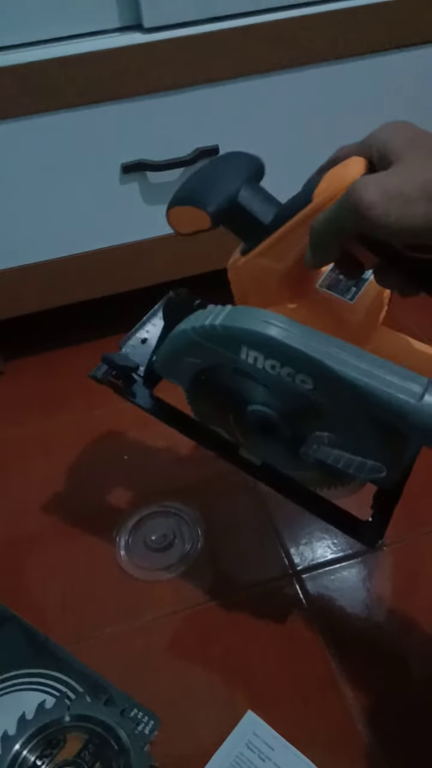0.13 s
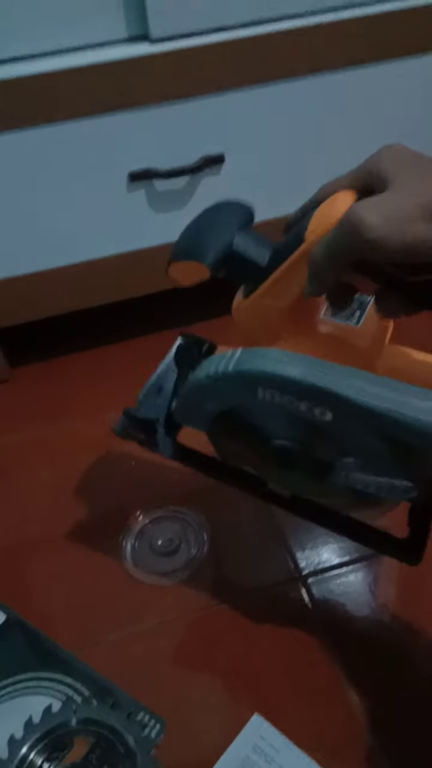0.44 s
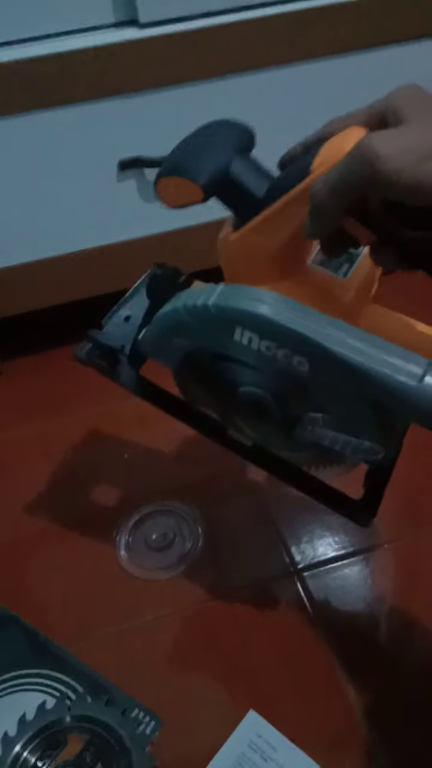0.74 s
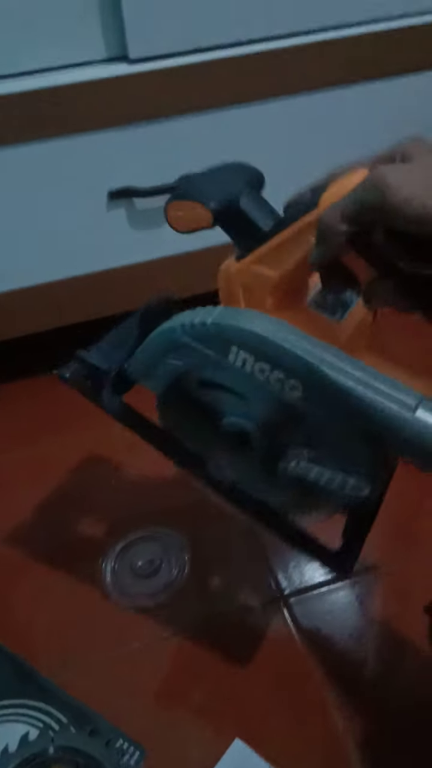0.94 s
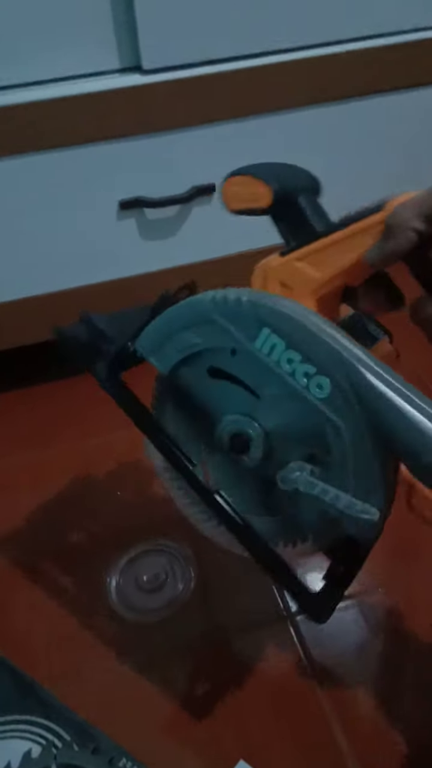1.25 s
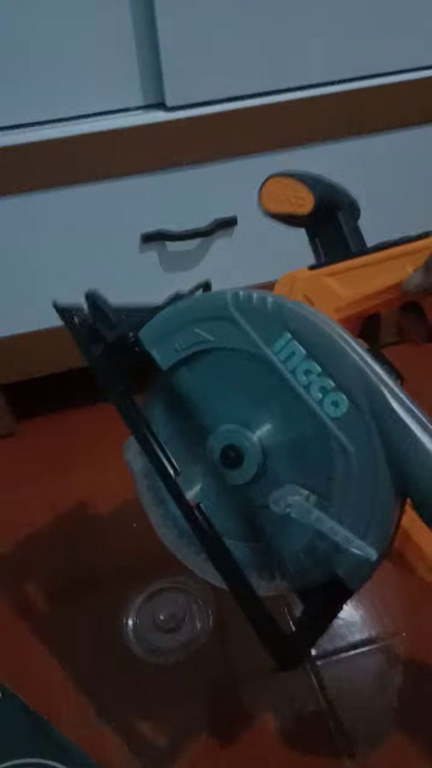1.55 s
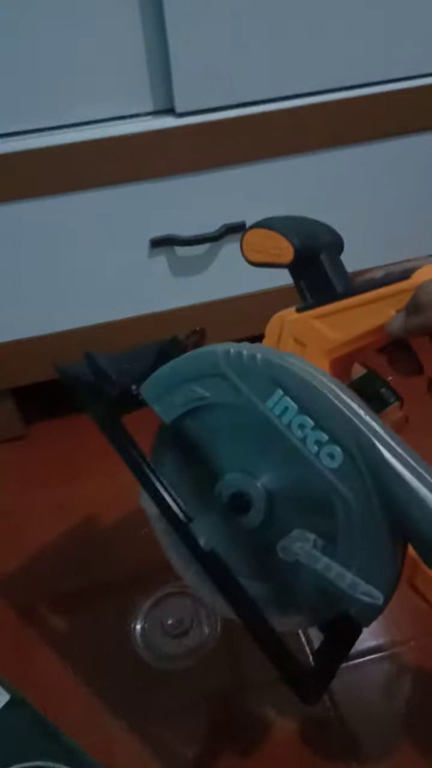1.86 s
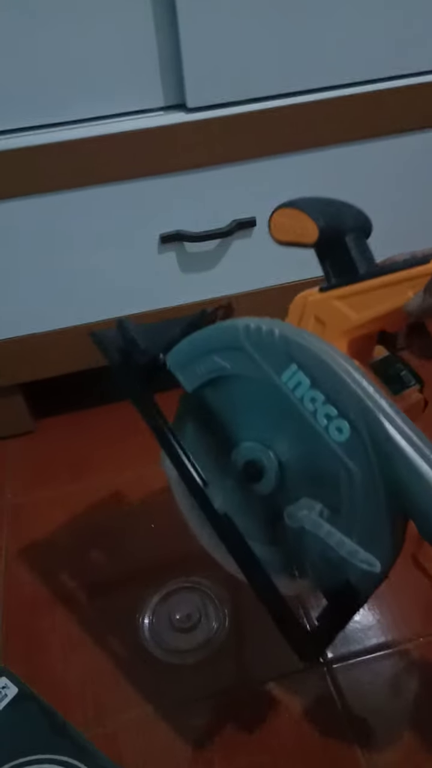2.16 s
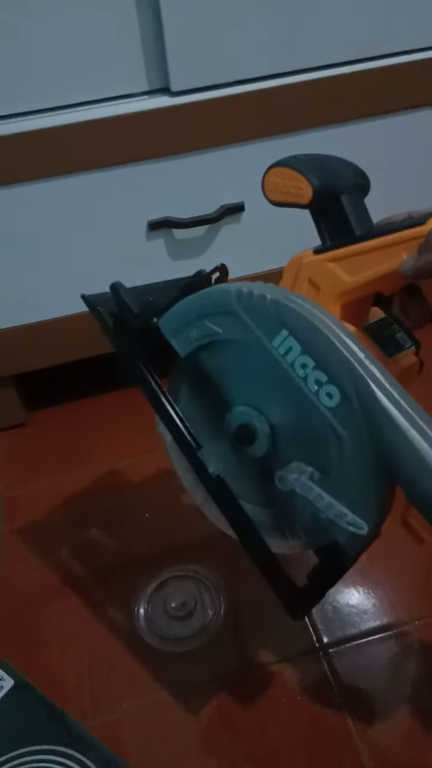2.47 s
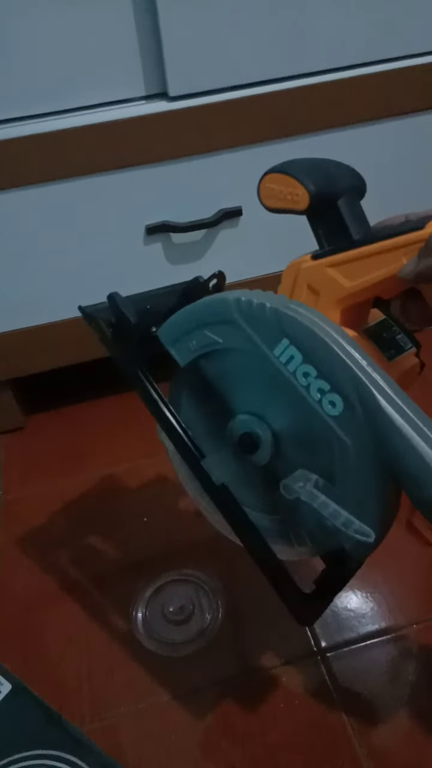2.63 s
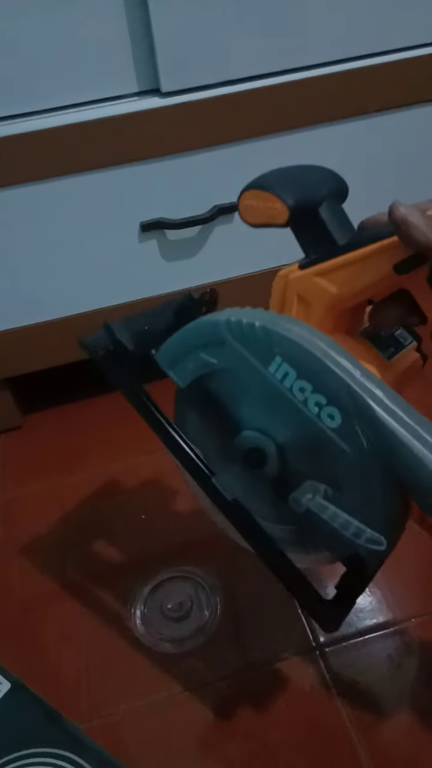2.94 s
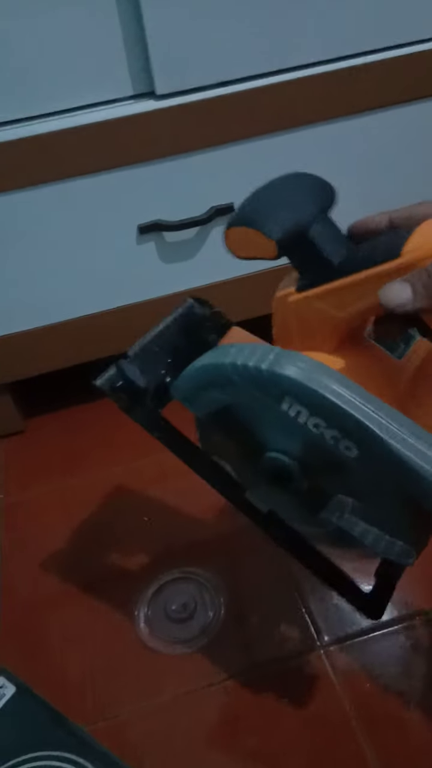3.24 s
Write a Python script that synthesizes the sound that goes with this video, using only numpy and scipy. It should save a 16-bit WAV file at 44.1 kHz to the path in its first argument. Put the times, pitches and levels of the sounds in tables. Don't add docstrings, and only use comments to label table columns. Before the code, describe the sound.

A circular saw, close up in a small tiled room, clicks almost at once and bursts into harsh gear rattle and whine from 0.1 to 0.45 seconds. It brakes with a falling squeal, leaving shimmering blade ringing over swelling room hum. A second click at 1.5 starts a longer, steady gritty run until 3.2, when the whine swoops down loudly, gears knock, and the blade rings on.

```python
import sys
import numpy as np
from scipy import signal
from scipy.fft import rfft, irfft
from scipy.io import wavfile
from scipy.ndimage import uniform_filter1d

SR = 44100
rng = np.random.default_rng(int(sys.argv[2]) if len(sys.argv) > 2 else 0)


def inscribe(sig):
    pcm = np.round(np.clip(np.atleast_2d(sig).T, -1, 1) * 32767)
    wavfile.write(sys.argv[1], SR, pcm.astype(np.int16))


def boost(x):
    u = np.asarray(x, float) / 20
    return 10 ** u


N = 149940
T = np.arange(N) / SR

# (motor on [s], brake [s], whine level [dB], brake swoop level [dB])
PULLS = [
    (0.1212, 0.445, -32, -58),
    (1.55, 3.181, -32, -17),
]

# (frequency [Hz], density [dB per Hz])
ROOM_HUM = [(15, -58), (25, -48.5), (96, 4), (260, -13.5), (315, -35.5), (439, -13), (483, -29),
            (1100, -28), (1430, -59), (2420, -120)]
# (time [s], peak level [dB], length [s])
CLICKS = [
    (0.0234, -18.5, 0.0038),
    (1.516, -23.5, 0.0043),
    (1.214, -51.5, 0.0064),
    (1.3159, -55, 0.0045),
    (1.331, -55, 0.0026),
    (1.382, -52.5, 0.004),
    (1.479, -47, 0.0025),
]
# (frequency [Hz], width [Hz], level [dB])
SWITCH_BODY = [(1214, 200, -8), (2150, 400, -5), (3160, 500, -1), (4660, 500, -6), (7340, 900, -1),
               (13000, 3000, -28)]
# (time [s], frequency
# [Hz], level [dB], length [s])
SHUDDERS = [(0.118, 2474, -14.5, 0.067), (0.151, 1200, -21, 0.0032), (0.192, 2390, -15.5, 0.035),
            (.69, 1840, -57, 0.036), (1.476, 2000, -55.5, 0.0082), (1.512, 1265, -32.5, 0.014),
            (1.56, 1410, -25, 0.012), (1.574, 1260, -19, 0.017), (1.638, 1417, -19, 0.017),
            (1.57, 2410, -14.5, 0.018), (1.62, 2300, -19.5, 0.029), (3.245, 2520, -10.5, 0.01),
            (3.272, 2810, -25, .015)]

# (time [s], level [dB], tilt [dB per octave])
EFFORT = [(.1205, -88, 7), (.123, -7, -9), (.16, -16.5, 1), (.25, -18.5, 3.5), (.45, -16.5, 1.5),
          (.52, -21.5, 0.5), (.62, -31.5, -5), (.735, -49, -31), (.76, -74.5, -13), (1.546, -72, -37.5),
          (1.55, -27.5, -4.5), (1.58, -17, -0.5), (1.7, -17.5, 2), (2.2, -19, 1.36), (3.18, -14.5, 0),
          (3.24, -19.5, 3.5), (3.32, -22.5, -4.5), (3.4, -49, -15)]
# (time [s], peak level [dB])
JOLTS = [(0.1341, -15), (0.1494, -12), (0.1675, -7), (0.1974, -9), (0.2483, -3), (0.2744, -5), (0.2994, -8),
         (0.3344, -8), (0.3674, -6), (0.4094, -6), (0.4464, -5), (0.5332, -14), (1.5883, -11), (2.0088, -6),
         (2.0582, -6), (2.0911, -7), (2.1201, -6), (2.2662, -8), (2.2994, -9), (2.3336, -10), (2.3501, -8),
         (2.4144, -10), (2.4638, -9), (2.4994, -11), (2.5272, -8), (2.6594, -12), (2.6724, -10),
         (2.6894, -9), (2.7057, -6), (2.7696, -6), (2.8024, -12), (2.8644, -12), (2.9494, -12),
         (3.0894, -11), (3.1414, -9)]
# (frequency [Hz], density [dB per Hz])
RATTLE = [(150, -35), (250, -45.5), (1120, -9.5), (2190, 2.5), (3360, -8), (8090, -11), (15300, -23.5)]
# (frequency [Hz], width [octaves], level [dB])
GUARD = [(1054, 0.033, -7.5), (4176, 0.079, 4.5), (5350, 0.1, -5), (6330, 0.078, 3.5), (8270, 0.14, 4.5),
         (11800, 0.047, 0), (14140, 0.078, 6)]
# (frequency [Hz], width [Hz], level [dB])
HOUSING = [(1867, 20, 4.5), (2328, 69, 9), (2510, 13, -8.5), (3350, 23, -1.5), (3680, 28, 8.5),
           (5800, 55, -35), (6830, 97, 5), (8400, 64, -24), (10900, 44, -53), (13300, 33, -28)]

TONE_HZ = [1620, 1744, 2024, 2175, 2331, 2649, 2893, 4048, 5690, 6078, 7983]
TONE_DB = [-35, -37, -35, -31, -36, -38, -39, -40, -48, -37, -43]
# (frequency [Hz], level [dB])
SINGING = [(3031, -35), (3664, -39)]

SQUEAL_DB = [-17, -20]
SECOND_HUM_DB = [-60, -49]

BLADE_HZ = [445, 785, 1242, 1309, 1801, 1840, 2202, 2577, 2682, 2757, 3022, 3087, 3277, 3659]
# (level at first stop [dB], level at second stop [dB], t60 [s])
BLADE = [(-63.5, -57.5, 7), (-56, -63, 1.66), (-57, -61, 8.7), (-48, -78, 7.1), (-18.5, -29, 0.53),
         (-37, -34, 0.95), (-33, -41, 1.32), (-49, -45, 2.2), (-34, -25.5, 0.77), (-24.5, -28, 1.43),
         (-30, -35.5, 1.22), (-35.5, -53.5, 9), (-25.5, -29.5, 1.96), (-37, -42, 1.8)]
BLADE_START = [0.15, 0.11, 0.09, 0.066, 0.14, 0.079, 0.036, .1, 0.072, 0.032, 0.102, 0.054, 0.064, 0.053]
RIM_HZ = [4710, 4798, 6630, 8527, 8562, 8702, 10556, 10598, 12418, 15234]
# (level at first stop [dB], level at second stop [dB], t60 [s])
RIM = [(-45, -50, 1.5), (-27, -35.5, 0.66), (-28.5, -45.5, 0.91), (-35, -35, 1.03), (-25.5, -39.5, 0.56),
       (-29, -48.5, 0.42), (-50.5, -58, 0.93), (-53, -52, 0.8), (-44, -45.5, 0.38), (-45.5, -26, 0.36)]
RIM_START = [.09, .09, .05, .04, .08, .08, .05, .05, .07, .07]
# (frequency [Hz], null after the brake [s], period [s], depth
BEATS = [(1309, 0.53, 0.85, 0.73), (2757, 0.62, 0.75, 0.76), (1801, 0.094, 0.49, 0.9),
         (3277, 0.088, 0.83, 0.66), (3087, 0.18, 0.855, 0.67), (6630, 0.2, 0.54, 0.8)]
# (frequency [Hz], null after the brake [s], period [s], depth [0-1])
LATE_BEATS = [(15234, .155, .3, .9), (10556, 0.085, .3, 0.6)]

# (time [s], gain [dB])
GAIN = [
    (0, 14.5),
    (.104, 12.5),
    (.112, -1),
    (.48, 2),
    (.8, 13.5),
    (1.51, 13),
    (1.545, 20.5),
    (1.575, 1.9),
    (3.22, -1.67),
    (3.4, 11.5),
]

ROOM_HUM_DB, HISS_DB, HISS_CUT_HZ = -56.5, -64, 2460
BEFORE_HZ, BEFORE_DB = 493, -62.5
ROOM_DB, ROOM_T60_S, TREBLE_T60_S, WALL_CUT_HZ = -10, .4, .2, 8000
SHUDDER_WIDTH_HZ = 266
MOTOR_HZ, GEAR_RATIO, WHINE_ORDER = 406, 6.56, 10.5
SPIN_FAST_S, SPIN_SLOW_S, SLOW_SHARE, BRAKE_S = .06, .2, .25, .07
JOLT_DB, JOLT_S = 7, .004
KNOCK_DEPTH, KNOCK_S, STEADY_LIMIT = 1, .0017, 1.5
GRIT_PER_S, GRIT_DB, SURGE_DB, PATCHY_DB, HOUSING_DB = 1200, -1.5, .5, 1.2, -10.5
TONE_WANDER_DB, HUM_DB, OVERTONE_DB = 2.5, -55.5, -5
SWOOP_HZ_PER_S, SWOOP_PEAK_S, SWOOP_RISE_S, SWOOP_END_S = 52000, .033, .2, .009
BRAKE_HUM_HZ, BRAKE_HUM_SAG, BRAKE_HUM_S, BRAKE_HUM_DB = 292, .1, .16, -47
SECOND_HUM_HZ = 232
SQUEAL_HZ, SQUEAL_FALL_HZ_PER_S, SQUEAL_S = 15000, 40000, .042
TAIL_HZ, TAIL_DB, TAIL_T60_S = 15000, -11, .3
RING_RISE_S = .05
SIDE_DB, MIC_LOW_HZ, MIC_TOP_HZ = -30, 48, 15600


def rms_one(x):
    return x / np.sqrt(np.mean(x ** 2) + 1e-20)


def in_time(rows):
    s, *columns = np.transpose(rows)
    return [np.interp(T, s, c) for c in columns]


def at_hz(points, hz):
    point_hz, point_db = np.transpose(points)
    return np.interp(np.log(hz), np.log(point_hz), point_db)


def drift(rate):
    r = np.exp(-80 * np.pi * rate / SR)
    slow = signal.lfilter([1], [1, -2 * r, r * r], rng.standard_normal(N // 40 + 2002))[2000:]
    return np.interp(np.arange(N) / 40, np.arange(len(slow)), rms_one(slow))


def low_noise(size):
    return uniform_filter1d(rng.standard_normal(N), size=size)


def lowpass(x, hz):
    return signal.sosfilt(signal.butter(2, hz, fs=SR, output="sos"), x)


def highpass(x, order, hz):
    return signal.sosfilt(signal.butter(order, hz, "high", fs=SR, output="sos"), x)


def resonate(x, peaks):
    out = 0
    for k, (hz, width_hz, db) in enumerate(peaks):
        r = np.exp(-np.pi * width_hz / SR)
        zeros = np.array([1, 0, -1]) * (1 - r * r) / 2
        poles = [1, -2 * r * np.cos(2 * np.pi * hz / SR), r * r]
        out = out + (-1) ** k * boost(db) * signal.lfilter(zeros, poles, x + 1e-18)
    return out


def bands(x, low_hz, count, gain_db):
    edges = np.minimum(low_hz * 2 ** (np.arange(count + 1) / 3), .45 * SR)
    out = 0
    for k, (a, b) in enumerate(zip(edges, edges[1:])):
        band = signal.butter(2, [a, b], "band", fs=SR, output="sos")
        out = out + boost(gain_db(np.sqrt(a * b))) * signal.sosfilt(band, x[k % 2])
    return out


def tone(hz):
    return np.sqrt(2) * np.sin(2 * np.pi * (np.cumsum(hz * np.ones(N)) / SR + rng.random()))


def background():
    def hum_db(hz):
        return at_hz(ROOM_HUM, hz) + 1.5 * drift(4)

    hum = rms_one(bands(rng.standard_normal((2, N)), 30, count=16, gain_db=hum_db))
    hiss = rms_one(lowpass(rng.standard_normal(N), HISS_CUT_HZ))
    before = (1 + .5 * drift(34)) * tone(BEFORE_HZ) * (T < PULLS[0][0])
    return boost(ROOM_HUM_DB) * hum + boost(HISS_DB) * hiss + boost(BEFORE_DB) * before


def switch():
    burst = 0
    for s, db, length in CLICKS:
        u = np.maximum(T - s, 0) / length
        burst = burst + boost(db + 14) * u * np.exp(-2 * u ** 1.4)
    return resonate(burst * rng.standard_normal(N), SWITCH_BODY)


def room(x):
    t, noise = T[:SR // 2], rng.standard_normal(SR // 2)
    dull = lowpass(noise, WALL_CUT_HZ)
    echoes = dull * boost(-60 * t / ROOM_T60_S) + (noise - dull) * boost(-60 * t / TREBLE_T60_S)
    echoes = echoes * np.minimum(t / .004, 1)
    return signal.fftconvolve(x, echoes / np.sqrt(np.sum(echoes ** 2)))[:N]


def shudders():
    out, noise = 0, rng.standard_normal(N)
    for s, hz, db, length in SHUDDERS:
        u = np.maximum(T - s, 0) / length
        burst = boost(db + 22.5) * np.tanh(8 * u) * np.exp(-2 * u ** 2) * noise
        peak = [(hz, SHUDDER_WIDTH_HZ, 0)]
        out = out + resonate(resonate(burst, peak), peak)
    return out


def speed():
    out = np.zeros(N)
    for on, off, *_ in PULLS:
        u = np.clip(T, on, off) - on
        fast = (1 - SLOW_SHARE) * np.exp(-u / SPIN_FAST_S)
        slow = SLOW_SHARE * np.exp(-u / SPIN_SLOW_S)
        out += (1 - fast - slow) * np.exp(-np.maximum(T - off, 0) / BRAKE_S)
    return out


def gears(spin):
    level_db, tilt_db = in_time(EFFORT)
    half_turns = np.cumsum(2 * MOTOR_HZ / GEAR_RATIO * (spin + .3 * (spin < .5))) / SR
    count = half_turns.astype(int)
    strength = np.clip(rng.exponential(1, 600), .4, STEADY_LIMIT)[count] * (1.3 - count % 2)
    hits = strength * (np.diff(half_turns // 1, prepend=0) > 0)
    knocks = signal.lfilter([1], [1, -np.exp(-1 / (KNOCK_S * SR))], hits)
    jolts = 0
    for s, db in JOLTS:
        jolts = jolts + boost(db + JOLT_DB) * (T > s) * np.exp(-np.maximum(T - s, 0) / JOLT_S)

    grit = (rng.random(N) < GRIT_PER_S / SR) * rng.choice([-1, 1], N)
    grit = grit * boost(2.9 * np.minimum(rng.exponential(1, N), 3))
    drive = rng.standard_normal((2, N)) + boost(GRIT_DB) * rms_one(grit)
    drive = drive * (1 + KNOCK_DEPTH * knocks * np.sqrt(spin) + jolts) * boost(SURGE_DB * drift(22))

    upper = drift(8.1)

    def colour(hz):
        patches = drift(24.3) + .33 * upper * (hz > 5000)
        return at_hz(RATTLE, hz) + tilt_db * np.log2(max(hz, 1400) / 2200) + PATCHY_DB * patches

    body = bands(drive, 127.9, count=21, gain_db=colour)
    hz = np.arange(1, N // 2 + 2) * SR / N
    guard_db = sum(db * np.exp(-(np.log2(hz / mid_hz) / width) ** 2) for mid_hz, width, db in GUARD)
    body = irfft(rfft(body) * boost(guard_db), N)
    steady = slice(2 * SR, 3 * SR)
    body = body / np.std(body[steady])
    rings = resonate(body, HOUSING)
    rings = rings / np.std(rings[steady])
    return boost(level_db) * (T > PULLS[0][0]) * (body + boost(HOUSING_DB) * rings)


def whine(spin):
    out = np.zeros(N)
    for hz, db in zip(TONE_HZ, TONE_DB):
        out += boost(db + 2.5 + TONE_WANDER_DB * drift(9.7)) * tone(hz * spin) * spin ** 12
    out += boost(HUM_DB + 2.5 * drift(5)) * tone(MOTOR_HZ * spin) * spin ** 6
    for hz, db in SINGING:
        out += boost(db + TONE_WANDER_DB * drift(5.3)) * tone(hz) * spin ** 4

    mesh_hz = WHINE_ORDER * MOTOR_HZ
    rough = drift(220) * tone(mesh_hz * spin * (1 + .012 * drift(9)))
    overtone = low_noise(40) * 6 * boost(4 * drift(25)) * tone(3.1 * mesh_hz * np.sqrt(spin))
    rough = rough + boost(OVERTONE_DB) * overtone
    grain = 1 + .45 * drift(150)
    for on, off, db, swoop_db in PULLS:
        out += boost(db) * rough * (T > on) * (T < off) * spin
        late = T - off - SWOOP_PEAK_S
        pitch = mesh_hz - SWOOP_HZ_PER_S * np.clip(T - off - .005, 0, .06)
        swell = .43 * (late < 0) * np.exp(late / SWOOP_RISE_S) + .84 * np.exp(-(late / SWOOP_END_S) ** 2)
        out += boost(swoop_db) * (T > off) * swell * grain * tone(pitch)
    return out


def brake():
    out = 0
    for (_, off, *_), squeal_db, second_db in zip(PULLS, SQUEAL_DB, SECOND_HUM_DB):
        u = np.maximum(T - off, 0)
        done = u / BRAKE_HUM_S
        hum = np.clip(u / .0081, 0, 1) * np.clip((BRAKE_HUM_S - u) / .031, 0, 1)
        hum = hum * boost(-5 * done) * (1 + .23 * drift(30))
        sagging = tone(BRAKE_HUM_HZ * (1 - BRAKE_HUM_SAG * np.minimum(done, 1)))
        out = out + boost(BRAKE_HUM_DB - 5 * (off < 1)) * hum * sagging
        out = out + boost(second_db) * hum * tone(SECOND_HUM_HZ + 100 * u)

        tail = low_noise(20) * 4 * tone(TAIL_HZ)
        out = out + boost(squeal_db + TAIL_DB - 60 * u / TAIL_T60_S) * (u > 0) * tail
        pitch = SQUEAL_HZ - SQUEAL_FALL_HZ_PER_S * np.minimum(u, SQUEAL_S)
        swell = np.sin(np.pi * np.minimum(u / SQUEAL_S, 1))
        out = out + boost(squeal_db) * swell * low_noise(24) * 3.9 * tone(pitch)
    return out


def blade():
    modes = list(zip(BLADE_HZ + RIM_HZ, BLADE + RIM, BLADE_START + RIM_START))
    out = 0
    for k, (_, off, *_) in enumerate(PULLS):
        alive = np.clip((PULLS[1][0] + .033 - T) / .03 + 99 * k, 0, 1)
        for hz, (first_db, second_db, t60), start in modes:
            rise = np.clip((T - off - start) / RING_RISE_S, 0, 1) ** 2
            u = np.maximum(T - off - .1, 0)
            swell = .8
            for beat_hz, null, period, depth in (BEATS, LATE_BEATS)[k]:
                if abs(beat_hz / hz - 1) < .003:
                    swell = np.abs(1 - depth * np.exp(2j * np.pi * (T - off - null) / period)) / 2
            level = boost((first_db, second_db)[k] - 60 * u / t60)
            out = out + level * alive * rise * swell * tone(hz)
    return out


def scene():
    spin = speed()
    saw = switch() + shudders() + gears(spin) + whine(spin) + brake()
    mid = saw + boost(ROOM_DB) * room(saw) + blade() + background()
    side = boost(SIDE_DB) * np.gradient(mid)
    return np.array([mid + side, mid - side])


def band_limit(x):
    return signal.sosfilt(signal.butter(12, 16100, fs=SR, output="sos"), x)


def record(dry):
    gain_db, = in_time(GAIN)
    ridden = highpass(dry, 4, MIC_LOW_HZ) * boost(gain_db)
    rounded = highpass(.72 * np.tanh(ridden / .72), 2, 30)
    top_cut = signal.ellip(8, .5, 50, MIC_TOP_HZ, fs=SR, output="sos")
    mix = signal.sosfilt(top_cut, rounded)
    return band_limit(mix)


dry = scene()
out = record(dry)
inscribe(out)
```